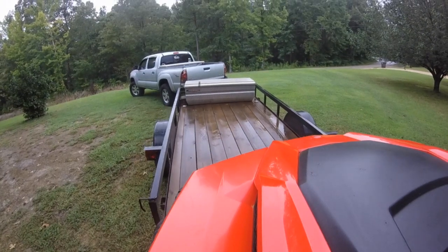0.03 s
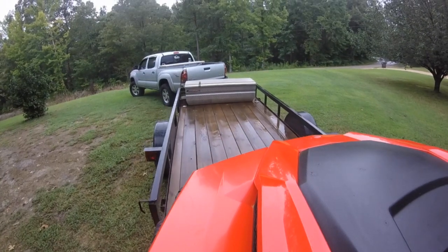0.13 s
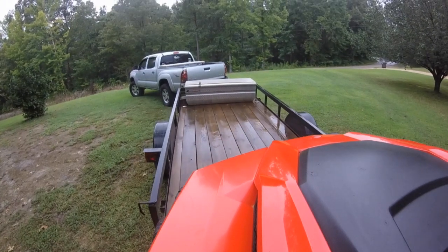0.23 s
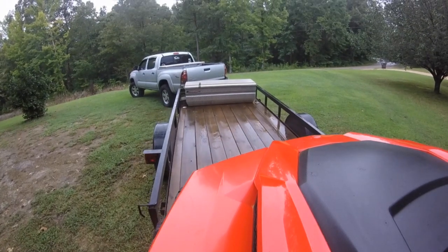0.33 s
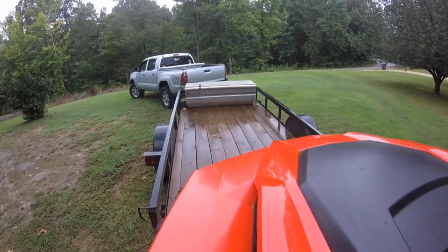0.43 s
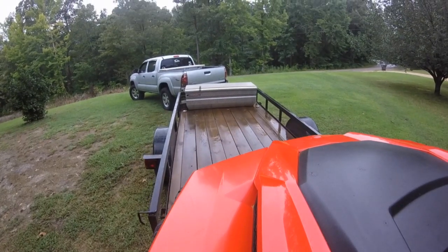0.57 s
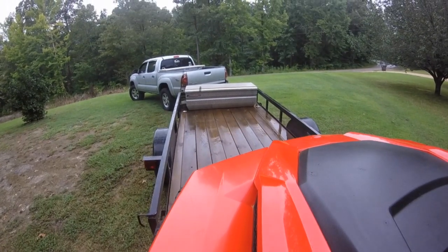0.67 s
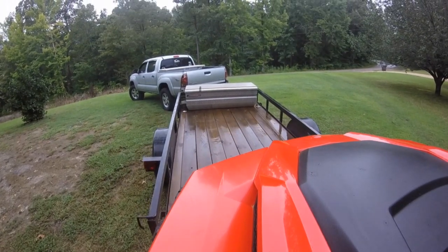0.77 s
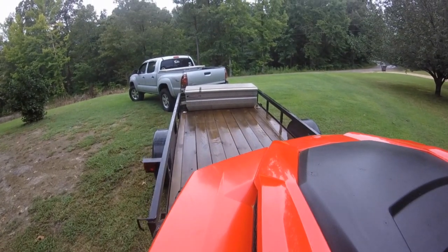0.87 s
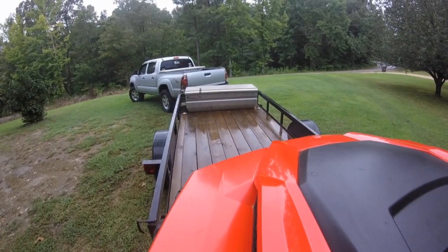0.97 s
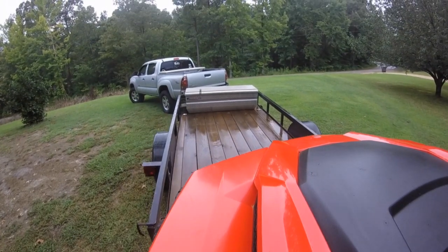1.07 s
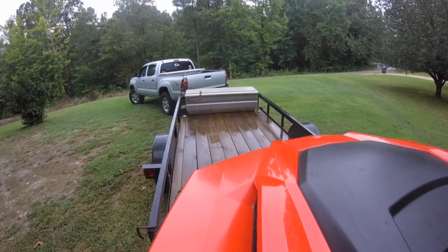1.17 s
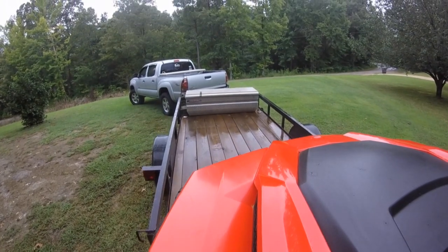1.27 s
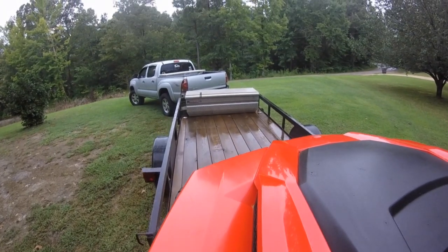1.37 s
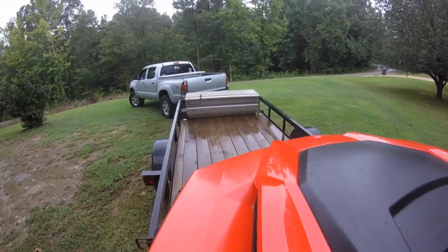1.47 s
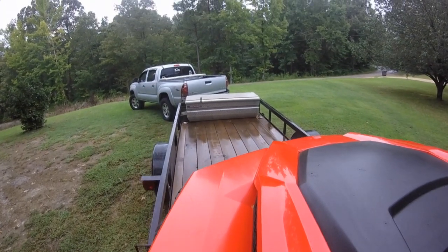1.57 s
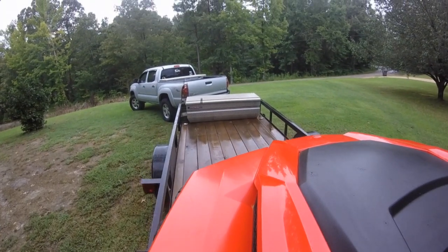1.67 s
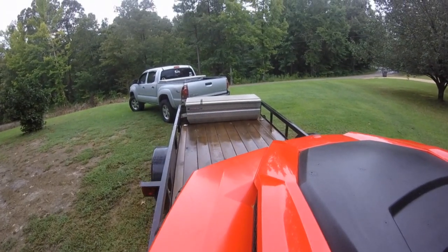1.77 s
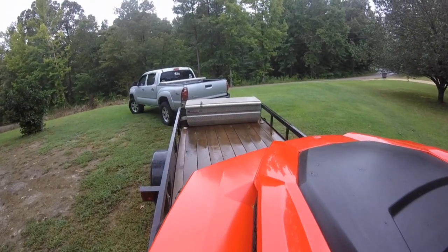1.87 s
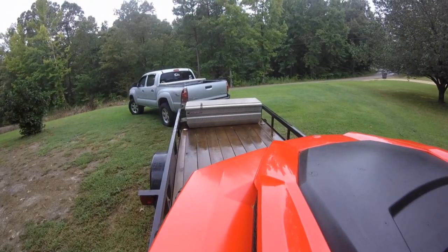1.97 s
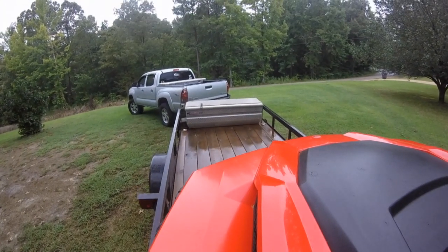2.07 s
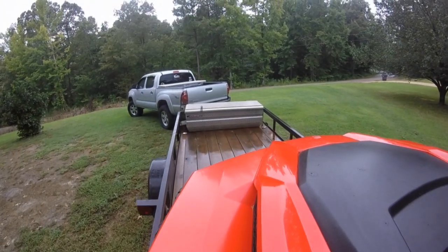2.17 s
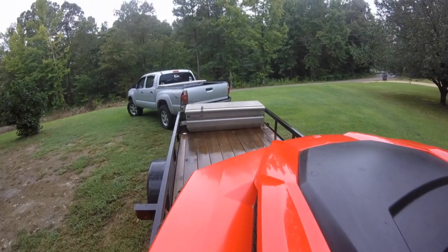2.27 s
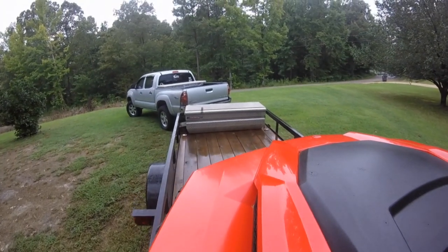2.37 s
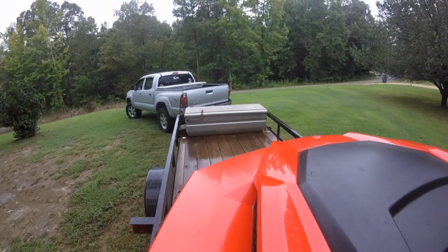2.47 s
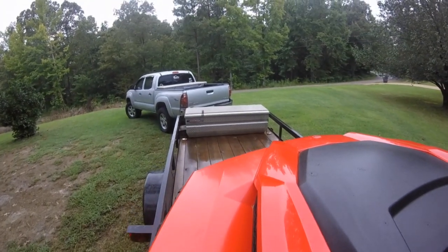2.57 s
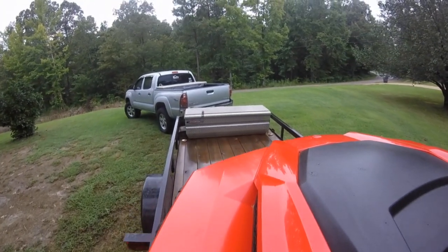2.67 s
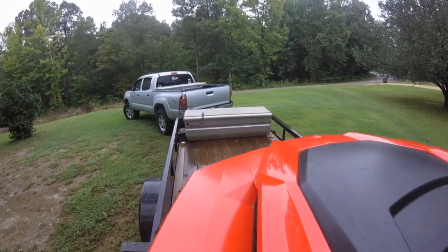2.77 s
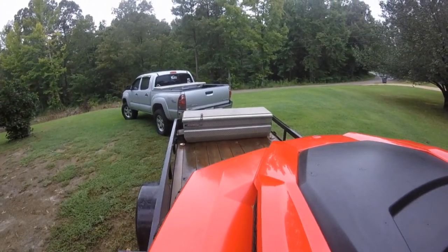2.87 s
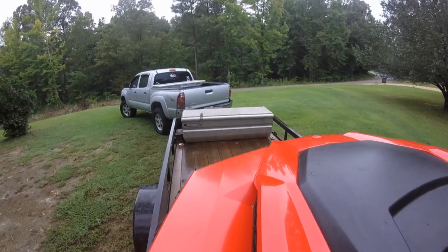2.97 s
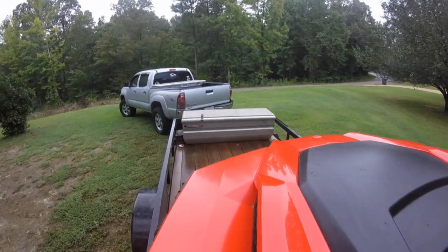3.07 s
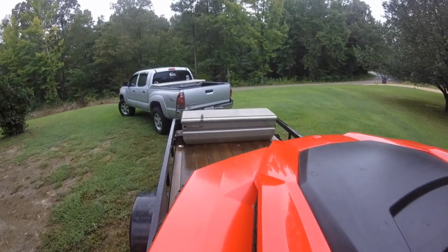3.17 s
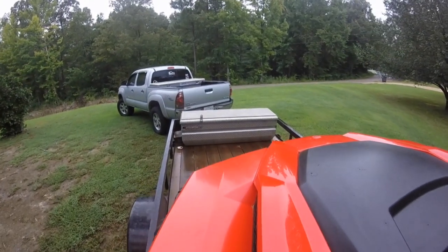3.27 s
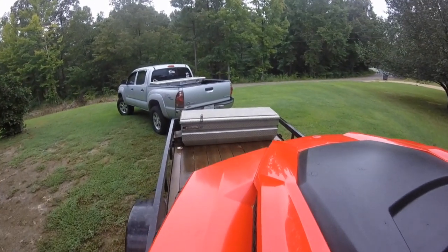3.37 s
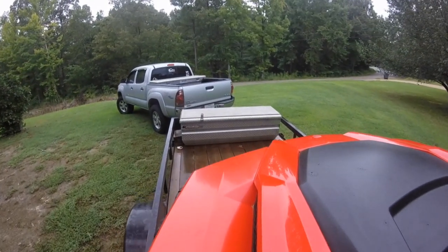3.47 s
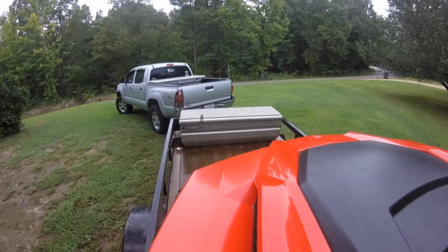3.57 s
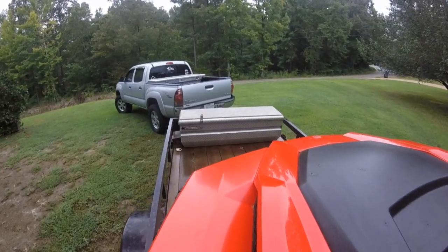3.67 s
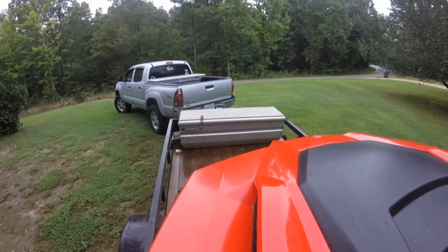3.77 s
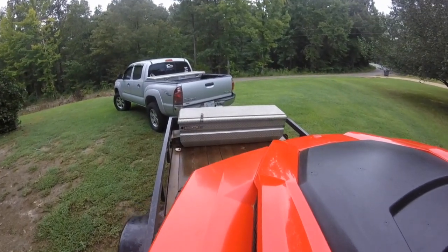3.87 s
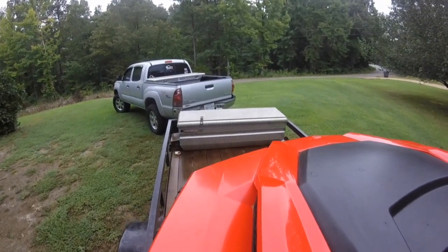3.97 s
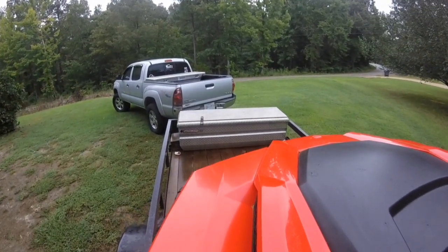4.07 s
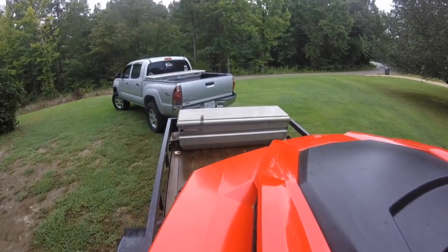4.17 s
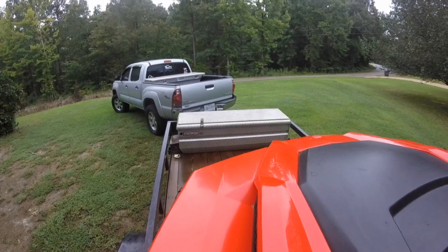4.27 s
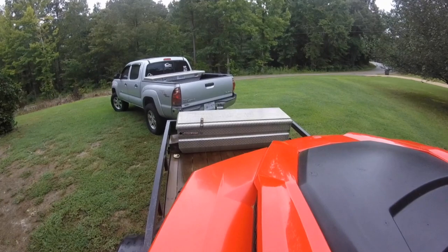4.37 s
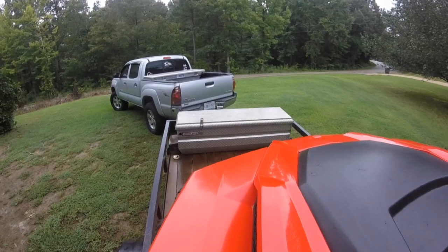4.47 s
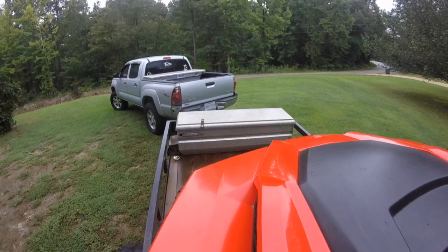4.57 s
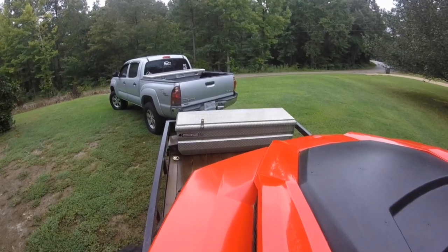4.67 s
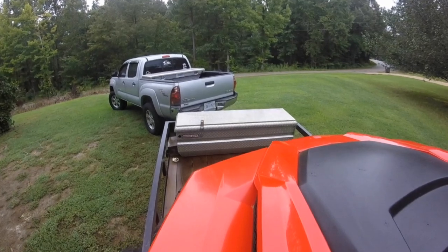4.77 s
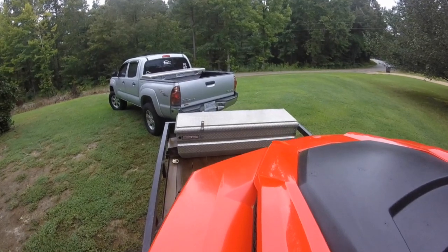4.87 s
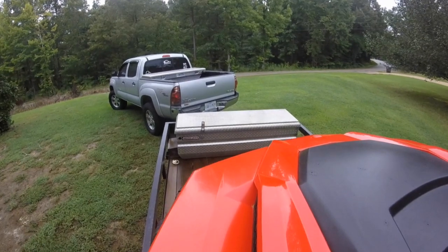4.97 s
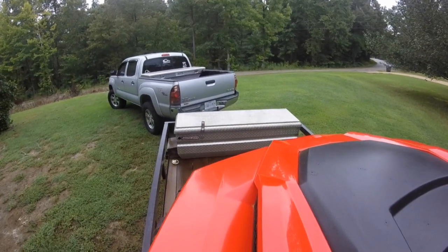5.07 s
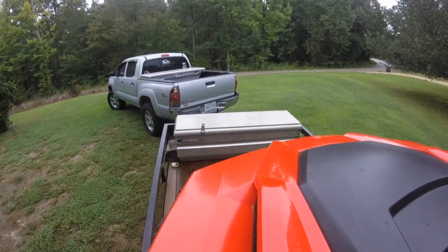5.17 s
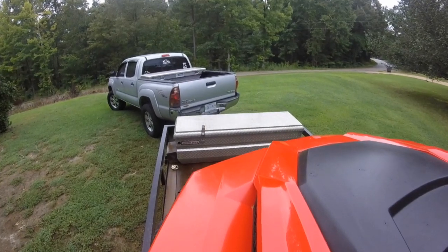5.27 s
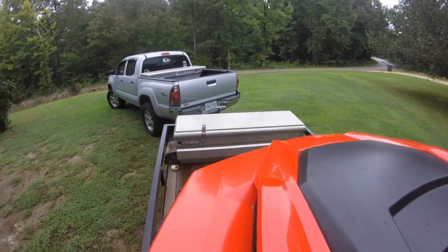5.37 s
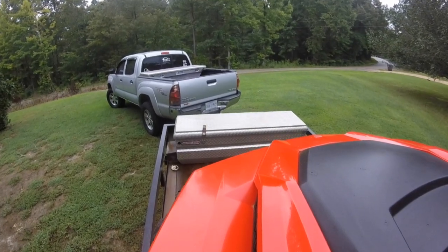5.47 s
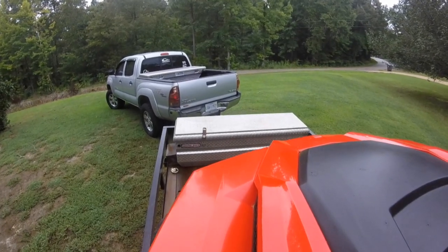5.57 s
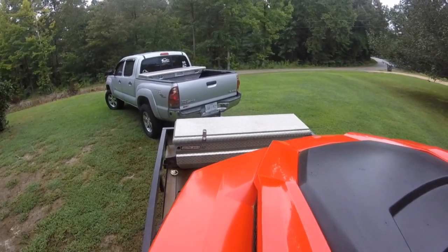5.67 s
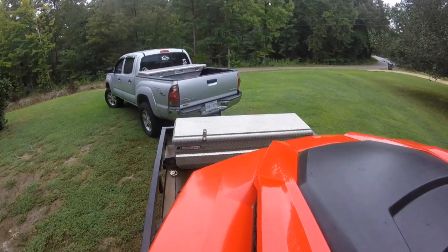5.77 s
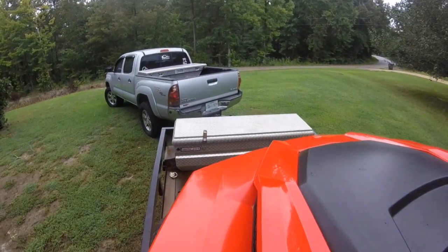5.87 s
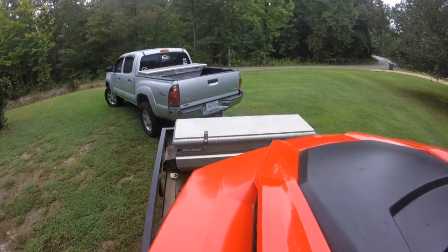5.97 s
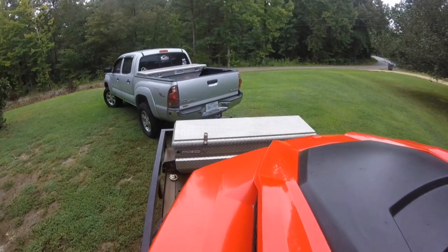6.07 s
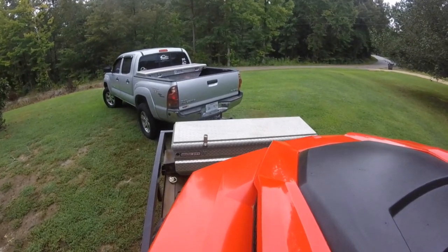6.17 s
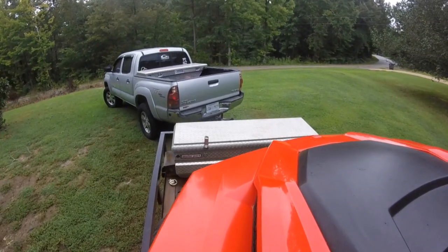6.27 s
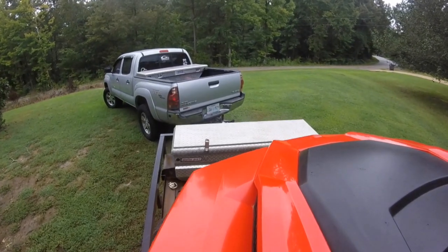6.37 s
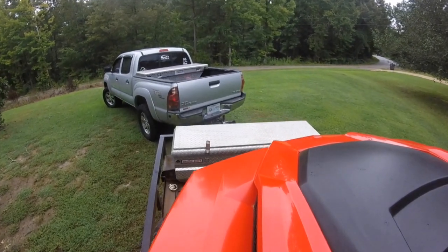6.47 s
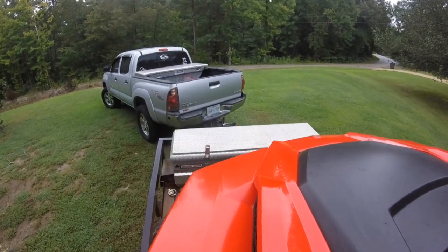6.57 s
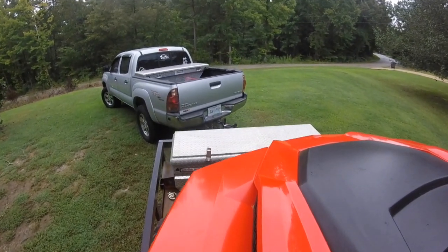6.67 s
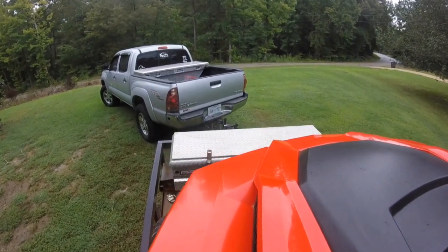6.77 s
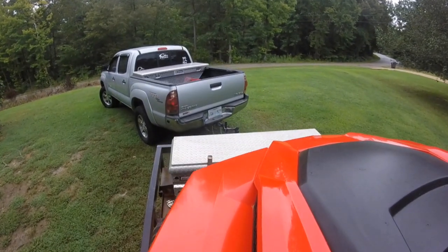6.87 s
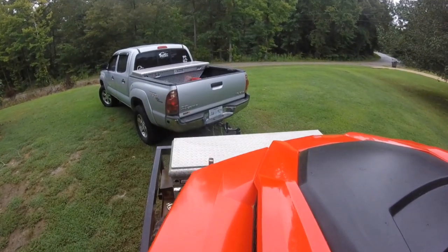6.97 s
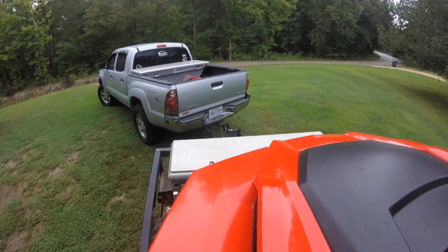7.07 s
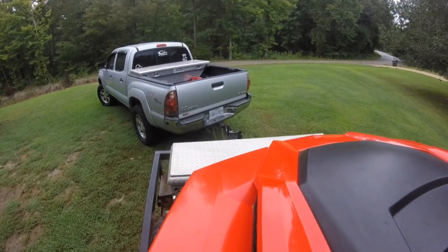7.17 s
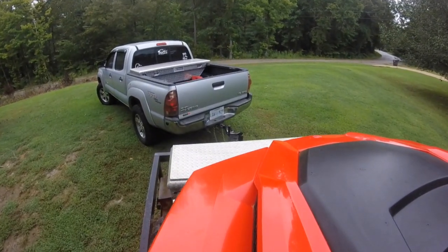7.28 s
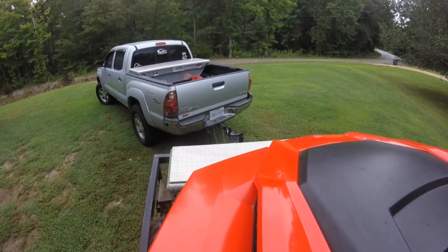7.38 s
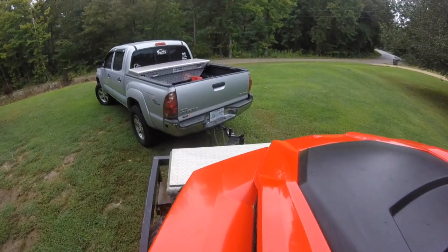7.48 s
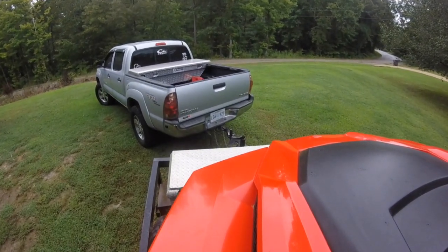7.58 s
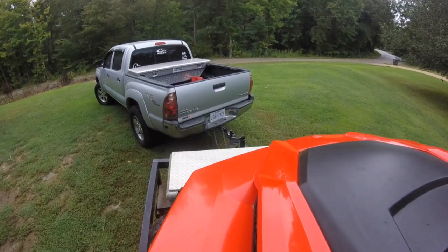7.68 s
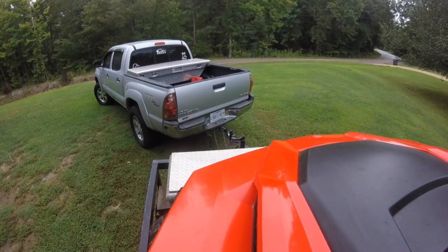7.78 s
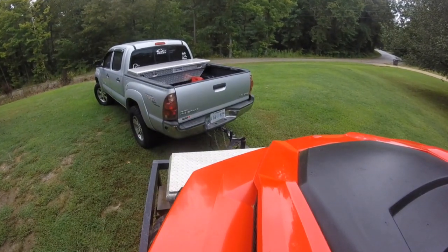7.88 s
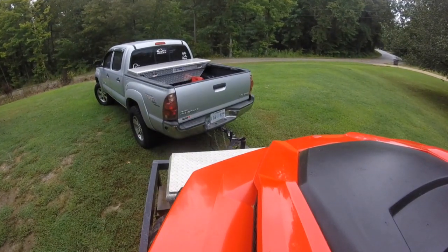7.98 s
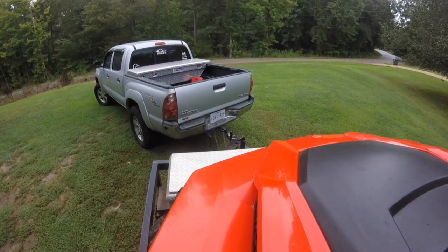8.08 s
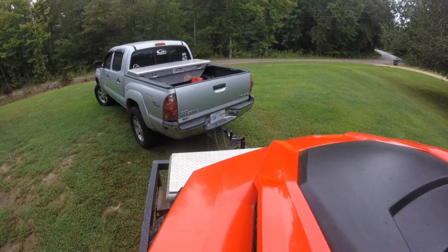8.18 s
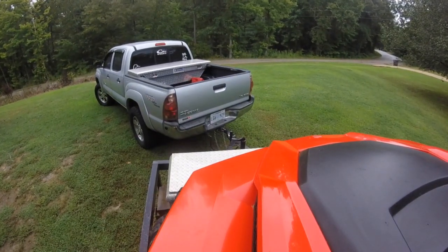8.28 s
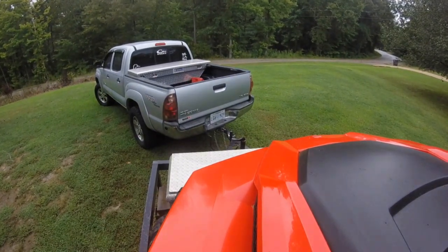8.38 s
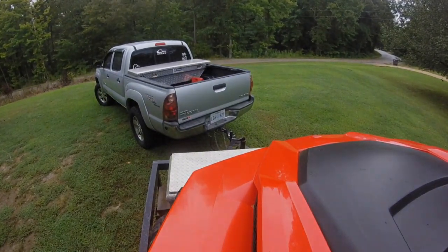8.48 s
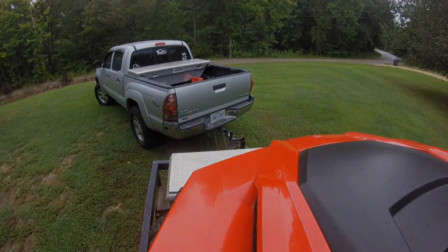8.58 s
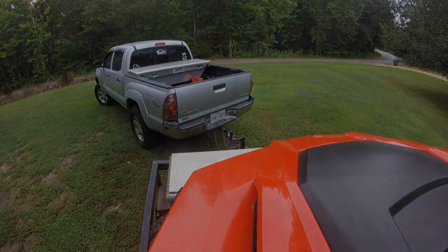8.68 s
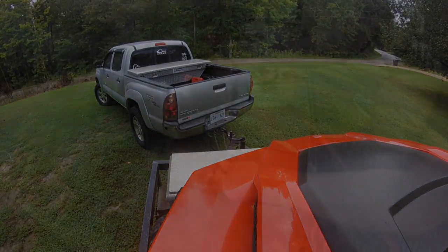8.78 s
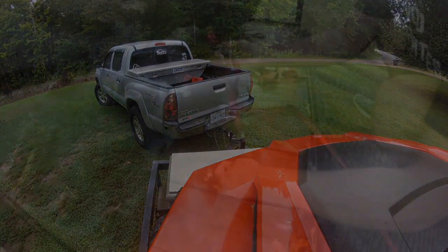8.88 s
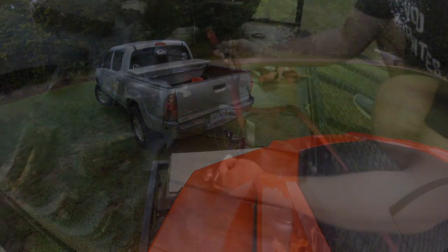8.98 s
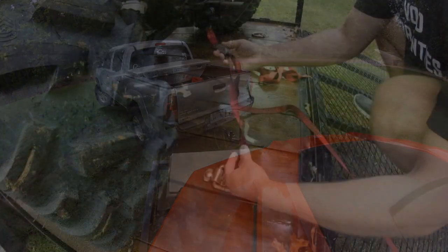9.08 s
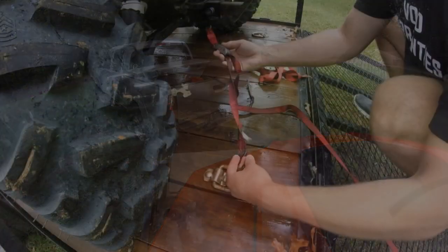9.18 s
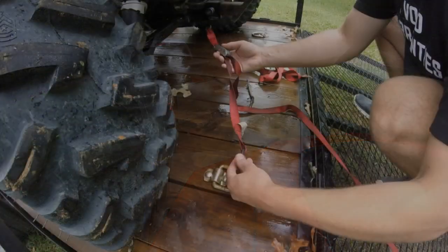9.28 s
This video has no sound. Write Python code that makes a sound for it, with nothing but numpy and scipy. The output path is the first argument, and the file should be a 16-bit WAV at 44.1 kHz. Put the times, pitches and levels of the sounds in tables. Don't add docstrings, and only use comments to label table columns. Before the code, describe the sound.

Heard from on top of the hood, a twin-cylinder off-road vehicle pulls slowly up onto a trailer in an open yard. The exhaust booms low and uneven, with gear and belt whir, rattling covers and thin hiss. Deck boards clunk and groan. Near seven seconds the throttle closes, the boom collapses into slow separate puffs with skips, and everything fades to faint insects and air.

```python
import sys
import numpy as np
from scipy import signal
from scipy.fft import rfft, irfft, next_fast_len
from scipy.io import wavfile
from scipy.ndimage import uniform_filter1d, map_coordinates

SR = 44100
rng = np.random.default_rng(int(sys.argv[2]) if len(sys.argv) > 2 else 0)


def store_pcm(level_fs):
    pcm = np.round(np.clip(level_fs, -1, 1) * 32767).astype(np.int16)
    wavfile.write(sys.argv[1], SR, np.atleast_2d(pcm).T)


def nominal_scale(level):
    x = np.asarray(level, float) / 20
    return 10 ** x


N = 411453
TIME = np.arange(N) / SR
CRUISE = 17.3


def unit(x):
    return x / np.sqrt(np.mean(x ** 2) + 1e-20)


def curve(rows):
    s, value = np.transpose(rows)
    return np.interp(TIME, s, value)


def spells(rows):
    return sum(size * np.exp(-((TIME - s) / half) ** 2) for s, half, size in rows)


def wobble(rate):
    coarse = TIME[::32]
    knots = rng.standard_normal(int(N * rate / SR) + 4)
    return np.interp(TIME, coarse, map_coordinates(knots, [coarse * rate]))


def filtered(x, response):
    m = next_fast_len(N + SR // 2)
    return irfft(rfft(x, m) * response(np.fft.rfftfreq(m, 1 / SR)), m)[:N]


def modes(table, soft_hz):
    def response(f):
        rings = sum(nominal_scale(db) * 1j * f * w / (hz * hz - f * f + 1j * f * w) for hz, w, db in table)
        return rings / (1 + 1j * f / soft_hz) ** 2
    return response


def ringing(table, soft_hz=2930):
    return unit(filtered(rng.standard_normal(N), modes(table, soft_hz)))


def rush(spectrum, patchy_db):
    z = signal.stft(rng.standard_normal(N + 512), nperseg=512)[2]
    field = rng.standard_normal(z.shape)
    field = uniform_filter1d(uniform_filter1d(field, 5, 0), 8, 1)
    noise = signal.istft(z * nominal_scale(patchy_db * unit(field)), nperseg=512)[1][:N]
    f, db = np.transpose(spectrum)
    return unit(filtered(noise, lambda hz: nominal_scale(np.interp(np.log(hz + 1), np.log(f), db))))


# (time [s], speed [cycles per s])
THROTTLE_SPEED = [(0, 17.974), (.6, 16.215), (1.486, 17.414), (3.05, 18.174), (3.75, 17.138),
                  (4.95, 18.642), (5.493, 18.498), (6.45, 17.167), (6.782, 15.99), (7.091, 13.484),
                  (7.37, 12.43), (8.244, 13.782), (9.33, 10.65)]
# (time [s], loss [cycles per s])
BOGS = [(0.146, 2.76), (0.737, 1.05), (1.123, 1.29), (1.671, 0.98), (1.956, 1.41), (2.315, 1.07),
        (2.677, 0.39), (3.168, 0.69), (3.408, 0.61), (3.88, 0.41), (4.32, 0.27), (4.655, 1.02),
        (4.995, 1.07), (5.386, 0.46), (5.967, 1.01), (7.39, 0.34), (7.58, 0.95), (7.837, 1.49),
        (8.097, 1.79), (8.366, 2.38), (8.702, 1.54), (9.05, 0.24)]


def engine_speed():
    return curve(THROTTLE_SPEED) - spells([(s, .1523, loss) for s, loss in BOGS])


# (time [s], level [dB])
LOAD = [
    (6.85, 0.5),
    (7.1, -3.5),
    (7.3, -43),
]


def engine_load():
    return nominal_scale(curve(LOAD))


def idle_share(load):
    return np.sqrt(np.abs(1 - load ** 2))


FIRING = (.285, .51)
# (time [s], level [dB])
MISFIRES = [(7.27, -4.5), (7.5, -2), (7.52, -5), (7.84, -22), (8.015, -19), (8.19, -4.5), (8.36, -22),
            (8.62, -20.5), (8.64, -4)]


def firings(turns, scatter_db, jitter):
    cycle = np.arange(int(turns[-1]))[:, None]
    luck = rng.standard_normal((len(cycle), 2, 2))
    s = np.interp(cycle + FIRING + jitter * luck[..., 0], turns, TIME)
    size_db = scatter_db * luck[..., 1]
    for when, db in MISFIRES:
        nearest = np.unravel_index(np.argmin(abs(s - when)), s.shape)
        size_db[nearest] = db
    return np.bincount((s * SR).astype(int).ravel(), nominal_scale(size_db).ravel(), N)


def order(turns, k, lead):
    return np.sqrt(2) * np.cos(2 * np.pi * (k * turns + lead + .0026 * k * wobble(8)))


def orders(turns, table):
    return sum(nominal_scale(db + 1.6 * wobble(2.7)) * order(turns, k, lead) for k, db, lead in table)


# (time [s], level [dB])
EFFORT = [(0, -8.5), (3, -9), (4.95, -9), (5.5, -11.3), (6.45, -11), (6.8, -12.5), (7.1, -11.5)]
BOOM_LEAD = (.11, .44)


def exhaust_boom(turns, speed):
    pipe_hz, pipe_width_hz, steep_db = 77.5, 14.4, 25.5

    def pipe_db(k):
        return -steep_db * np.log10(1 + ((k * speed - pipe_hz) / pipe_width_hz) ** 2)

    effort_db = curve(EFFORT)
    fourth_db = effort_db + pipe_db(4)
    fifth_db = effort_db[0] + 1.5 * (effort_db - effort_db[0]) - 2 + pipe_db(5)
    fourth = nominal_scale(fourth_db + 0.56 * wobble(15)) * order(turns, 4, BOOM_LEAD[0])
    fifth = nominal_scale(fifth_db + 0.3 * wobble(10)) * order(turns, 5, BOOM_LEAD[1])
    return fourth + fifth


# (order [waves per cycle], level [dB], lead [turns])
SILENCER_ORDERS = [(12, -0.5, .33), (13, 2.5, .9), (14, 3, 0.4), (15, -1, 0.9), (16, -4.5, 0.37),
                   (17, -7.5, 0.66)]
# (frequency [Hz], width [Hz], level [dB])
SILENCER = [(222, 42, 2), (248.7, 10, -4.5)]
# (time [s], half length [s], change [dB])
SILENCER_SPELLS = [(6.5, .6, 3.5), (4.9, .3, 2), (2.4, .4, -2.5)]


def silencer(turns, speed, uneven):
    level_db = -29 + 2 * np.clip(speed - CRUISE, -2, 0) + spells(SILENCER_SPELLS)
    rough = unit(filtered(uneven, modes(SILENCER, soft_hz=150)))
    return nominal_scale(level_db - 1) * (unit(orders(turns, SILENCER_ORDERS)) + nominal_scale(-7) * rough)


# (order [waves per cycle], level [dB], lead [turns])
MIDPIPE_ORDERS = [(7, -14, .05), (8, -8, .28), (9, 0, .71), (10, -6, .3), (11, -14, .2)]
# (frequency [Hz], width [Hz], level [dB])
MIDPIPE = [(156.2, 10, 0)]
# (time [s], half length [s], change [dB])
MIDPIPE_SPELLS = [(4.35, .3, -4), (5.25, .5, -8), (6.65, .3, 4), (.75, .25, 3)]


def middle_pipe(turns, speed, uneven):
    level_db = -28 - 2 * np.clip(speed - CRUISE, -1.5, 1.5) ** 2 + spells(MIDPIPE_SPELLS)
    rough = unit(filtered(uneven, modes(MIDPIPE, soft_hz=120)))
    return nominal_scale(level_db - 1.0) * (unit(orders(turns, MIDPIPE_ORDERS)) + nominal_scale(-8) * rough)


# (delay [s], size, width [s])
TAILPIPE = [(0, 1.5, .0014), (.0084, -2.5, .0021), (.0167, 2.0, .0022), (.025, -.7, .003)]
# (frequency [Hz], width [Hz], level [dB], delay [s])
CHAMBERS = [(256, 12, 11, .0091), (131, 16, 7, .0115), (62, 14, 6, .025)]


def puff(f):
    def late(s):
        return np.exp(-2j * np.pi * f * s)

    echoes = sum(size * np.exp(-(2 * np.pi * f * width) ** 2 / 2) * late(s) for s, size, width in TAILPIPE)
    rings = 0
    for hz, width, db, s in CHAMBERS:
        dull = np.exp(-(f / hz / 1.3) ** 6)
        rings = rings + late(s) * dull * modes([(hz, width, db)], soft_hz=900)(f)
    return (echoes - rings) * f ** 2 / (f ** 2 + 22 ** 2)


# (order [waves per cycle], level [dB], lead [turns])
SHAKE = [(1, -36, .72), (2, -37.5, .47), (3, -37.5, .51), (6, -38, .15)]


def engine(turns, speed):
    load = engine_load()
    uneven = firings(turns + 0.2998, scatter_db=0, jitter=0.032)
    loaded = exhaust_boom(turns, speed) + orders(turns, SHAKE)
    loaded += silencer(turns, speed, uneven) + middle_pipe(turns, speed, uneven)
    puffs = unit(filtered(firings(turns, scatter_db=0.5, jitter=0.0067), puff))
    return load * loaded + nominal_scale(-18.5) * np.sqrt(np.clip(1 - load ** 2, 0, 1)) * puffs


# (from [s], to [s], gears gain [dB], hiss gain [dB])
DECK = (3, 3.7, 1.8, 0.85)
# (time [s], half length [s], gain [dB])
BUMPS = [(.5, 0.13, 2), (1.85, 0.24, 2), (3.15, .15, 2.5), (6.78, .3, 1.5)]


def racket_levels(speed):
    deck = np.interp(TIME, DECK[:2], [0, 1])
    gears_db = -36.5 + 0.86 * (speed - CRUISE) + DECK[2] * deck + spells(BUMPS)
    hiss_db = -44.5 + 0.84 * (speed - CRUISE) + DECK[3] * deck
    return gears_db, hiss_db


# (frequency [Hz], density [dB per Hz])
GEARS = [(180, -34), (300, -1.5), (488, 3.5), (597, -3), (914, -6), (1160, -12), (1250, -6), (1320, -8.5),
         (2120, -26.5), (2400, -25.5), (3120, -43), (5280, -120)]
# (frequency [Hz], density [dB per Hz])
GEARS_IDLE = [(190, -43.5), (330, -1.5), (500, 1.2), (822, -3), (963, -2), (1160, -11.5), (1980, -16.5),
              (2400, -24.5), (3120, -48), (5280, -120)]


def gears(level_db, load):
    mesh = load * rush(GEARS, patchy_db=2) + idle_share(load) * rush(GEARS_IDLE, patchy_db=1.8)
    return nominal_scale(level_db) * mesh


# (frequency [Hz], density [dB per Hz])
HISS = [(900, -35), (1500, -9), (2200, -10.5), (3300, -18.5), (4650, -23.5), (5340, -31.5), (6800, -23.5),
        (7800, -31), (9200, -33.5), (10200, -37), (11200, -32), (13000, -34.5), (13700, -49.5),
        (15700, -54.5)]


def hiss(level_db):
    return nominal_scale(level_db + 0.29 * wobble(40)) * rush(HISS, patchy_db=1.0)


# (frequency [Hz], width [Hz], level [dB])
INTAKE = [(332, 58, 0), (420, 85, 1), (524, 78, -1.5)]


def intake(turns, gears_db, load):
    def air_box(f):
        return modes(INTAKE, soft_hz=500)(f) * f ** 4 / (f ** 4 + 280 ** 4)

    gulps = unit(filtered(firings(turns, scatter_db=1.5, jitter=.005), air_box))
    return (load + nominal_scale(-9) * idle_share(load) ** 2) * nominal_scale(gears_db - 6) * gulps


# (frequency [Hz], width [Hz], level [dB])
COVER = [(810, 37, -8), (929, 35, -8.5), (1057, 50, -7), (1388, 66, -13), (1586, 40, -14), (1930, 20, -15),
         (2093, 43, -15.5)]
# (frequency [Hz], width [Hz], level [dB])
COVER_IDLE = [(830, 60, -3), (960, 60, -1), (1234, 40, -10), (1600, 120, -10), (1950, 45, -2),
              (2100, 60, -11)]


def cover(beat, gears_db, load):
    level_db = gears_db - 6 + 2.2 * beat + (.8 + 1.7 * load) * wobble(10)
    return nominal_scale(level_db) * (load * ringing(COVER) + nominal_scale(-.5) * idle_share(load) * ringing(COVER_IDLE))


# (frequency [Hz], width [Hz],
# level [dB], spells of (time [s], half length [s], change [dB]))
PANELS_AND_HUMS = [(1231.5, 18, -49.5, [(2.65, .35, 8), (5, 1.1, 10), (6.3, 0.14, 12)]),
                   (273.2, 8, -36.5, [(1.5, 1.5, -9), (6.95, .45, 10)]), (410.3, 5, -48, [(6.65, .3, 6)]),
                   (671, 25, -51.5, [(1.55, .45, 12), (3.06, .3, 9.1), (5.1, .5, 6.5), (7.17, .2, 9.6)])]


def panels_and_hums(beat, speed):
    level_db = 0.88 * (speed - CRUISE) - 2.5 + 1.5 * beat
    buzz = 0
    for hz, width, db, rows in PANELS_AND_HUMS:
        buzz = buzz + nominal_scale(db + spells(rows) + 1.2 * wobble(12)) * ringing([(hz, width, 0)])
    return nominal_scale(level_db) * buzz


# (frequency [Hz], width [Hz], level [dB])
VALVES = [(11200, 700, 0), (12600, 900, -1.5)]
# (frequency [Hz], width [Hz], level [dB])
SQUEAK = [(9450, 250, 0)]
# (time [s], half length [s], gain [dB])
SQUEAK_SPELLS = [(1.45, .55, 10)]


def valves_and_pulley(turns):
    def thin(table):
        noise = filtered(rng.standard_normal(N), lambda f: modes(table, soft_hz=30000)(f) * (f < 13600))
        return nominal_scale(5 * np.cos(2 * np.pi * (turns - .2)) + 1.5 * wobble(9)) * unit(noise)

    return nominal_scale(-27) * thin(VALVES) + nominal_scale(-38 + spells(SQUEAK_SPELLS)) * thin(SQUEAK)


# (frequency [Hz], density [dB per Hz])
RUMBLE = [(15, -14.5), (30, -3), (60, 6), (120, 1), (250, 4), (400, -20.5), (600, -57.5)]


def rumble(load):
    return nominal_scale(-37 + 3.5 * idle_share(load) + 2.9 * wobble(5.5)) * rush(RUMBLE, patchy_db=1.0)


def racket(turns, speed):
    load = engine_load()
    gears_db, hiss_db = racket_levels(speed)
    beat = np.cos(2 * np.pi * (turns - .45)) * (1 + 1.3 * idle_share(load) ** 2)
    shared = wobble(7) + 0.63 * wobble(20)
    out = gears(gears_db - 0.07 + 0.5 * beat + 0.5 * shared, load)
    out += hiss(hiss_db - 0.23 + 0.14 * beat + .5 * shared)
    out += intake(turns, gears_db, load) + cover(beat, gears_db, load) + panels_and_hums(beat, speed)
    return out + nominal_scale(hiss_db) * valves_and_pulley(turns) + rumble(load)


def place(out, s, sound):
    out[round(s * SR):][:len(sound)] += sound


# (time [s], peak level [dB], frequency [Hz], crack level [dB])
CLUNKS = [(0.489, -28, 957, -14), (0.764, -20, 613, -21), (1.566, -25.5, 1145, -21),
          (1.976, -22.5, 612, -25), (3.099, -23, 620, -23), (3.145, -21, 658, -27), (3.201, -22, 676, -29),
          (3.451, -23, 945, -20), (3.592, -18, 1240, -29), (3.724, -25.5, 1242, -21), (3.92, -22, 710, -27),
          (4.034, -16.5, 960, -31), (4.099, -18.5, 1056, -26), (4.715, -27, 1057, -21),
          (5.387, -22.5, 965, -30), (5.649, -24, 933, -25), (6.638, -25, 1350, -20),
          (6.648, -15.5, 790, -21.5), (6.878, -29, 1083, -17), (7.117, -25, 912, -30),
          (7.189, -26, 810, -29), (7.503, -14.5, 889, -21), (8.689, -23, 600, -29)]


def clunks(out, t):
    bounces = [(s + .014, db - 5, .9 * hz, crack_db + 1.2) for s, db, hz, crack_db in CLUNKS]
    fall = nominal_scale(-60 * t / .07) * (1 - np.exp(-t / .002)) ** 2
    band = signal.butter(3, [600, 3100], "band", fs=SR)
    partials = [(.86, .5), (1, 1), (1.17, .4), (1.65, 0.39), (2.2, 0.16)]
    for s, db, hz, crack_db in CLUNKS + bounces:
        rough = 1 + 0.46 * unit(uniform_filter1d(rng.standard_normal(len(t)), size=150))
        body = rough * sum(g * np.sin(2 * np.pi * hz * k * t) for k, g in partials)
        crack = unit(signal.lfilter(*band, rng.standard_normal(len(t))))
        place(out, s - .004, nominal_scale(db - 1) * fall * (body + nominal_scale(crack_db + 9) * crack))


# (time [s], level [dB], frequency [Hz], time to fall 60 dB [s])
GROANS = [(1.95, -33.5, 472, 0.082), (2.19, -26, 470, 0.065), (2.3, -33.5, 461, 0.074),
          (2.41, -26.5, 548, 0.037), (3.15, -24.5, 510, 0.037), (3.33, -28.5, 499, 0.063),
          (3.74, -28, 512, 0.069), (4.24, -32, 490, .1), (6.56, -24.5, 478, 0.046), (6.8, -33, 480, 0.064),
          (6.87, -26, 485, 0.059), (7.05, -32, 481, 0.19), (7.13, -34, 457, 0.1), (8.7, -31, 492, 0.058)]


def groans(out, t):
    for s, db, hz, t60 in GROANS:
        swell = nominal_scale(-60 * t / (3 * t60)) * (1 - np.exp(-t / 0.01))
        place(out, s, nominal_scale(db + 8.5) * swell * np.sin(2 * np.pi * hz * t))


# (time [s], peak level [dB], frequency [Hz])
TAPS = [(1.561, -38, 3230), (5.2994, -37, 3260), (5.7553, -33.5, 3500), (5.977, -28, 3520),
        (6.9405, -41, 3520), (7.059, -39, 3550), (8.2704, -49, 3300)]


def taps(out, t):
    for s, db, hz in TAPS:
        place(out, s, nominal_scale(db - 60 * t / 0.029) * np.sin(2 * np.pi * hz * t))


def trailer():
    out, t = np.zeros(N + SR), TIME[:SR // 4]
    clunks(out, t)
    groans(out, t)
    taps(out, t)
    return filtered(out[:N], lambda f: 1 / (1 + 1j * f / 7000) ** 3)


# (multiple of blade note, level [dB])
FAN = [(2, -35), (3, -42.5), (4, -51)]
# (from [s], to [s])
FAN_STOPS = (.8, 2.6)


def fan():
    phase = 2 * np.pi * np.cumsum(136.7 * (1 + .007 * wobble(12))) / SR
    hum = sum(np.sqrt(2) * nominal_scale(db + 3 * wobble(9)) * np.sin(k * phase) for k, db in FAN)
    return np.interp(TIME, FAN_STOPS, [1, 0]) * hum


# (frequency [Hz], density [dB per Hz])
YARD = [(1500, -40), (3000, -8), (4500, -3), (5500, -9), (6900, 1.5), (8000, -10), (13000, -20),
        (15000, -60)]


def yard_air():
    return nominal_scale(-64) * rush(YARD, patchy_db=1.2)


# (from [s], silent at [s])
FADE = (8.53, 9.498)


def scene():
    speed = engine_speed()
    turns = np.cumsum(speed) / SR
    fade = np.interp(TIME, FADE, [1, 0])
    vehicle = engine(turns, speed) + racket(turns, speed) + trailer() + fan()
    return (fade * vehicle + (1 - fade) * yard_air())[None]


def low_pass(x):
    return signal.sosfilt(signal.butter(12, 15680, fs=SR, output="sos"), x)


def record(dry):
    return low_pass(dry)


dry = scene()
out = record(dry)
store_pcm(out)
```